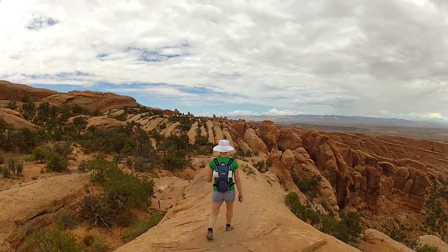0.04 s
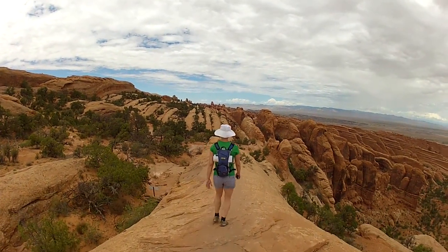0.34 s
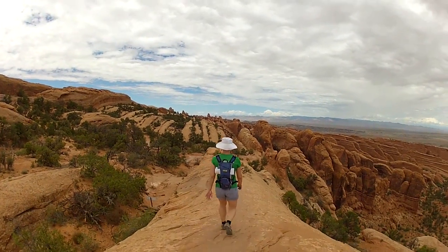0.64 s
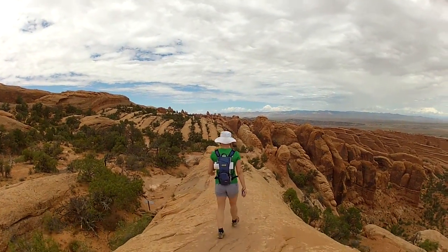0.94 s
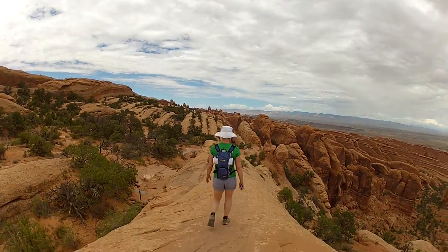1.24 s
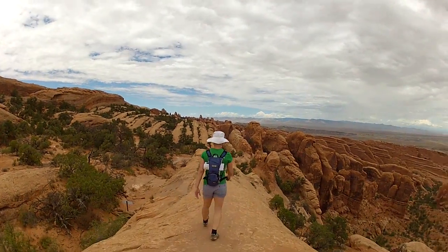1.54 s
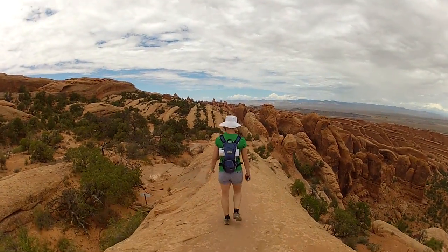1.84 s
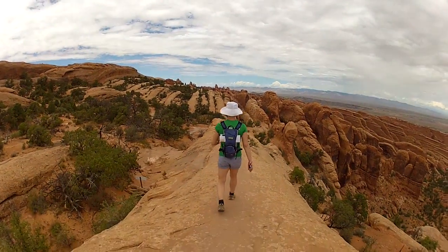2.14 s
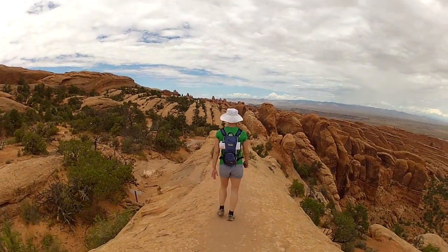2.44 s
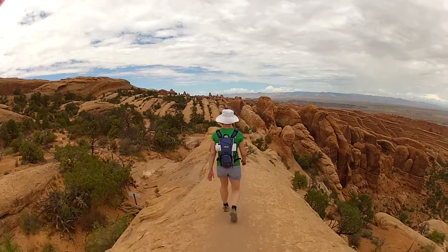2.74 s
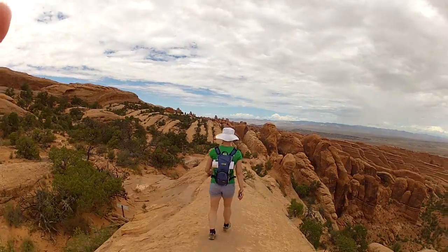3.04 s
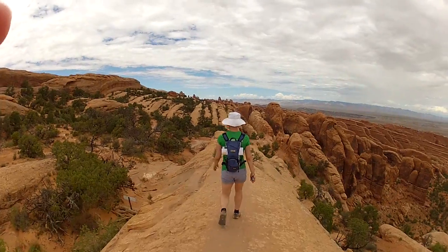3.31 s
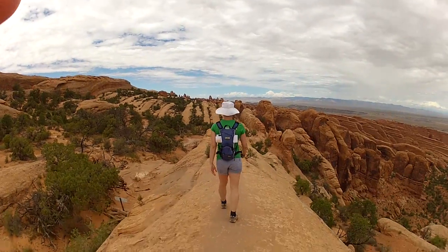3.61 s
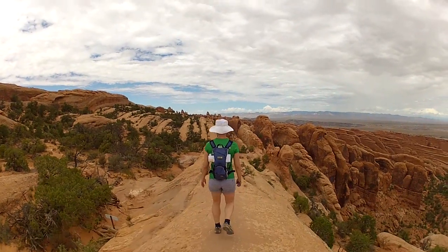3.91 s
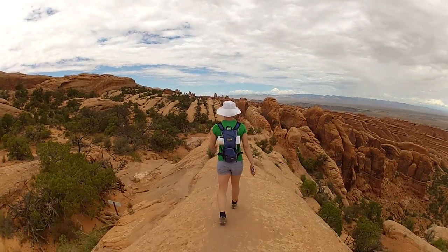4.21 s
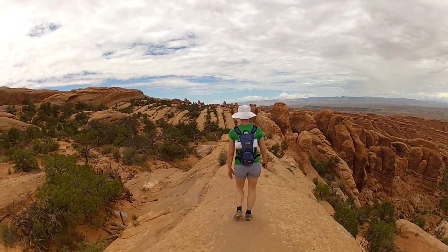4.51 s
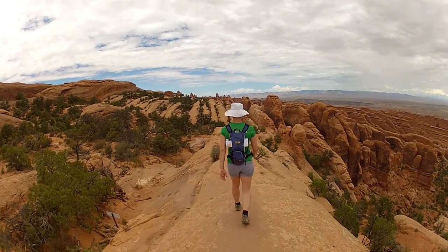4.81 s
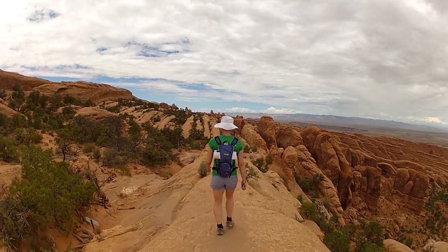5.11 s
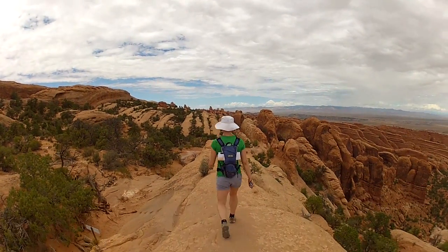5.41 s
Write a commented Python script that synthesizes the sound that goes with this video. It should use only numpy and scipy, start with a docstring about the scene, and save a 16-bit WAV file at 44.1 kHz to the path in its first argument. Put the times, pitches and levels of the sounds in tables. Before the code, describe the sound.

Low, booming wind buffets a hand-held microphone in the open air, strongest near the start and then dying down. Through it come steady footsteps on sandy stone, some dull and soft, others sharp clacks with a spit of grit. A buckle clicks on plastic about once a step, and clothes rustle faintly. The sound is close and dry, with a slightly glassy top.

```python
"""A walk along a bare sandstone ridge, heard close and without echo on a small cased camera in the hand.
From the start shoes tap and grind on the gritty rock, and a loose buckle ticks on the plastic case.
Within the first second gusts buffet the microphone. After two seconds they ease and the rock gets
sandier, with more grains cracking underfoot; by the end the wind has almost dropped.
Throughout, the camera's coarse sampling gives every sound a glassy top."""
import sys
import numpy as np
from scipy import signal
from scipy.fft import rfft, irfft, next_fast_len
from scipy.io import wavfile
from scipy.ndimage import uniform_filter1d

SR = 44100
rng = np.random.default_rng(int(sys.argv[2]) if len(sys.argv) > 2 else 0)


def persist_wave(psi):
    """Save psi, clipped to +-1, as 16-bit WAV."""
    counts = np.round(np.clip(psi, -1, 1) * 32767).astype(np.int16)
    wavfile.write(sys.argv[1], SR, np.atleast_2d(counts).T)


N = 249606
T = np.arange(N) / SR

# footfalls, about two a second: (time [s], heel thud [dB], heel clack [dB], grit [dB], clack pitch [Hz],
# heel-to-sole lag [s], sole clack [dB], grinding [dB], scuff [dB])
FOOTFALLS = [(0.093, -30.5, -35, -61, 1050, 0.0073, -45, -56, -61),
             (0.623, -20, -24, -31, 1100, 0.0041, -27, -60.5, -58.5),
             (1.117, -36, -23, -57, 1230, 0.0066, -22.5, -57.5, -56),
             (1.569, -36, -13.5, -23, 1290, 0.0048, -24.5, -60, -56.5),
             (2.002, -30, -30, -54, 1330, .005, -43, -61, -60),
             (2.497, -23, -22.5, -30, 1750, .004, -44, -65, -60.5),
             (3.029, -30.5, -27, -60, 1240, .005, -42, -52, -58),
             (3.57, -24.5, -13, -25, 1510, .003, -41, -55.5, -57),
             (4.047, -32, -37.5, -56, 1100, .009, -43.5, -52.5, -58.5),
             (4.521, -44, -57, -44, 1000, 0.0063, -54, -61, -60),
             (5.047, -25.5, -16.5, -34, 1720, 0.0024, -45, -55.5, -59),
             (5.543, -25, -15, -58, 1500, 0.0018, -45, -57, -59.5)]
# single eddies that hit the microphone port: (time [s], level [dB], frequency [Hz])
EDDIES = [(0.515, -18, 99), (0.572, -13.5, 170), (0.7565, 2, 120), (0.7964, -5.5, 135), (0.915, -17.5, 150),
          (1.051, -18, 121), (1.1, -12.5, 127), (1.254, -11.5, 157), (1.32, -13, 148), (1.38, -10.5, 140),
          (1.6172, -6, 180), (1.656, -10.5, 152), (1.963, -13.5, 148), (2.087, -17, 107), (2.255, -18, 158),
          (3.09, -21, 140), (3.256, -22, 143), (4.382, -23.5, 59.5), (4.635, -23, 75)]
# steady rustle of the walker's clothes: (time [s], level [dB])
CLOTHES = [(0, -63), (0.5, -64), (1.45, -62.5), (1.8, -60), (3.3, -60), (4.5, -59.3), (4.85, -61.5),
           (5.66, -62)]


def steps(graze_db=-23, graze_lead_s=0.006, sole_hz=925):
    """The tread brushes the sand, the heel lands and the sole follows; lighter taps fall in between."""
    # light, dull taps of the shoes: (time [s], clack [dB], thud [dB], clack pitch [Hz])
    taps = [(0.656, -42, -37, 1250), (1.069, -39, -47, 1510), (1.091, -42, -30.5, 1290),
            (1.14, -35, -36, 980), (1.201, -38, -43, 1300), (1.744, -41.5, -34, 905),
            (1.984, -42, -46, 915), (2.193, -43, -43, 960), (2.732, -47.5, -40.5, 1120),
            (2.806, -38, -37.5, 1820), (2.993, -37, -32.5, 1140), (3.257, -41.5, -34, 940),
            (3.326, -44, -36, 900), (4.318, -41, -35.5, 915), (4.378, -33, -41.5, 1760),
            (4.853, -52, -40, 900), (4.918, -36.5, -33.5, 1580), (4.991, -37, -35, 1100),
            (5.394, -60, -39.5, 900), (5.465, -37.5, -34.5, 1450)]
    out = np.zeros(N)
    for s, thud_db, clack_db, grit_db, pitch_hz, lag_s, sole_db, *_ in FOOTFALLS:
        graze = band(rng.standard_normal(SR // 80), 500, 4500) * np.hanning(SR // 80)
        add(out, s - graze_lead_s, from_db(clack_db + graze_db) * peak_one(graze))
        add(out, s, shoe(thud_db, clack_db, grit_db, pitch_hz))
        add(out, s + lag_s, shoe(sole_db + 1, sole_db, sole_db + 0.5, sole_hz))   # lower than the heel
    for s, clack_db, thud_db, pitch_hz in taps:
        add(out, s, shoe(thud_db, clack_db, clack_db - 14, pitch_hz, crush_s=0.0024, crush_db=-13))
    return out


def shoe(thud_db, clack_db, grit_db, pitch_hz, crush_s=0.0018, crush_db=-18):
    """Each contact gives a thud of the heel, a dry clack of the sole and a spit of grit."""
    # resonances of a sole on rock: (multiple of the clack pitch, width [Hz], relative level [dB])
    sole_modes = [(.72, 450, -42.5), (1.05, 570, 28), (1.55, 600, 13)]
    t = np.arange(SR // 16) / SR
    force = contact(t, crush_s, crush_db)
    thud = band(band(force, 200, 740), 150, 880, order=1)
    sole = sum(from_db(db) * resonate(force, ratio * pitch_hz, width) for ratio, width, db in sole_modes)
    clack = band(sole, 660, 2420, order=4)   # rubber swallows the treble
    grit = band(contact(t, crush_s=0.0014, crush_db=-17.5), 2670, 4840)
    return (from_db(thud_db) * peak_one(thud)
            + from_db(clack_db) * peak_one(clack)
            + from_db(grit_db) * peak_one(grit))


def contact(t, crush_s, crush_db, touch_s=0.0012):
    """Grains begin to crush, the hard touch follows, and the crushing dies away."""
    weight = np.minimum(t / touch_s, 1) * np.exp(-np.maximum(t - touch_s, 0) / crush_s)
    force = from_db(crush_db) * rng.standard_normal(len(t)) * weight
    force[int(touch_s * SR)] += 1
    return force


def buckle(bounce_s=0.004, bounce_db=-6, usual_brightness_db=-11, grip_detune=0.0035):
    """Right by the microphone the buckle hits the case and bounces once; the grip shifts the modes."""
    # knocks of the buckle: (time [s], level [dB], brightness [dB])
    knocks = [(0.126, -31, -13), (0.678, -36, -13), (0.7097, -38.5, -12.5), (1.179, -44.5, -21),
              (1.6362, -35, -10.5), (1.8047, -17, -11), (2.1139, -27.5, -11.5), (2.6413, -28, -12),
              (3.1309, -21, -10), (3.6497, -33, -11), (4.0935, -24.5, -9.5), (4.6149, -20.5, -12),
              (4.73, -32, -13.5), (5.1268, -29, -10)]
    # modes of the plastic case: (frequency [Hz], relative level [dB], time to fall 60 dB [s])
    case_modes = [(1132, -19.5, 0.059), (1580, -22, 0.035), (2082, -4, 0.039), (2390, -6.5, 0.035),
                  (2747, 3, 0.012), (2811, 3.5, 0.024), (3060, -4.5, 0.039), (3178, -5, 0.037),
                  (3630, 3.5, 0.0048), (3820, -6, 0.019), (3910, -4, 0.027), (4255, -13, 0.019),
                  (4384, -15.5, 0.04), (5150, -14, 0.022), (5233, 6.5, 0.0062)]
    out, t = np.zeros(N), np.arange(SR // 12) / SR
    rest_hz, mode_db, t60 = np.transpose(case_modes)[:, :, None]
    for s, db, bright_db in knocks:
        hz = rest_hz * (1 + grip_detune * rng.standard_normal(rest_hz.shape))
        octaves_up = np.log2(np.maximum(hz / 2800, 1))
        tilt_db = 4.0 * (bright_db - usual_brightness_db) * octaves_up   # hard touches wake upper modes
        shell = 0
        for delay_s, touch_db in [(0, 0), (bounce_s * rng.uniform(0.611, 1.0), bounce_db)]:
            age = np.maximum(t - delay_s, 0)
            strength = from_db(mode_db + tilt_db + touch_db + rng.normal(0, 1.7, hz.shape))
            phase = 2 * np.pi * (hz * age + rng.random(hz.shape))
            rings = strength * np.sin(phase) * np.exp(-np.log(1000) * age / t60)
            onset = 1 - np.exp(-age / 0.00071)   # the shell takes a moment to speak
            shell = shell + rings.sum(axis=0) * onset
        skid = band(rng.standard_normal(len(t)), 1240, 5300) * t * np.exp(-t / 0.0016)
        add(out, s, from_db(db + 3.0) * (peak_one(shell) + from_db(-10.5) * peak_one(skid)))
    return out


def buffets():
    """An eddy sucks at the diaphragm: a trough between lesser crests, steep-fronted if it is strong."""
    out, t = np.zeros(N), np.arange(-SR // 50, SR // 50) / SR
    front = np.tanh((t + 0.0008) / 0.00006) - 1
    for s, db, hz in EDDIES:
        steepness = 0.04 * min(from_db(db), 1) ** 8
        phase_squared = (np.pi * hz * t + steepness * front) ** 2
        add(out, s + t[0], from_db(db) * (2 * phase_squared - 1) * np.exp(-phase_squared))
    return out


def wind(ceiling_db=-13.5, usual_db=-25.5, calm_flutter_db=-57.5, puff_db=-22, puff_s=0.018):
    """Faster air sheds smaller eddies: sway and rumble in the breeze, boom, flutter and roar in gusts."""
    # strength of the air over the microphone: (time [s], level [dB])
    airflow = [(0.02, -26.5), (0.1, -48.5), (0.33, -60), (0.52, -30.5), (0.58, -23.5), (0.6, -49),
               (0.63, -26.5), (0.68, -42), (0.74, -10.5), (0.79, -12.5), (0.84, -25), (0.91, -20),
               (0.99, -39), (1.1, -20.5), (1.15, -38.5), (1.25, -18), (1.34, -32.5), (1.38, -20.5),
               (1.42, -36), (1.48, -25), (1.51, -28.5), (1.62, -14.5), (1.78, -37.5), (1.82, -26.5),
               (1.92, -37.5), (1.95, -22.5), (2.22, -33), (2.25, -25.5), (2.52, -27), (2.72, -37.5),
               (3.08, -26), (3.35, -36.5), (3.41, -29), (3.48, -41.5), (3.57, -35), (3.66, -50.5),
               (3.74, -37.5), (3.84, -50), (3.92, -33), (3.95, -44), (3.99, -30), (4.32, -42.5),
               (4.37, -33.5), (4.57, -39), (4.64, -33), (4.84, -46.5), (5.01, -36.5), (5.38, -53),
               (5.57, -47), (5.66, -62)]
    # spectra of the wind's five layers, lowest first: (frequency [Hz], relative level [dB])
    sway_spectrum = [(15, -14), (25, -7.5), (38, 2.5), (55, -20.5), (80, -21)]
    rumble_spectrum = [(30, -30), (50, -3.5), (70, 2), (100, -0.5), (130, -12), (200, -18.5)]
    boom_spectrum = [(70, -3), (105, -7), (125, 4), (155, -5), (195, -6), (250, -13.5), (400, -39)]
    flutter_spectrum = [(120, -20), (200, 4.5), (270, 1.5), (360, -3.5), (470, -16.5), (600, -28),
                        (800, -36.5)]
    roar_spectrum = [(300, -8.5), (450, 10), (600, -2), (800, -9), (1100, -24), (1600, -39.5)]
    wind_db = np.minimum(in_time(airflow), ceiling_db)   # anything stronger arrives as single eddies
    gust_db = -39.5 + 1.48 * (wind_db - usual_db)   # flutter grows faster than the wind
    # each eddy breaks up in a short puff of flutter
    puffs = swells([(s, db + puff_db) for s, db, _ in EDDIES], lambda t: np.exp(-(t / puff_s) ** 2))
    flutter_db = 10 * np.log10(from_db(gust_db) ** 2 + puffs ** 2 + from_db(calm_flutter_db) ** 2)
    breeze_db = uniform_filter1d(wind_db, SR // 16)
    boom_share = np.interp(wind_db, [-36, -24], [0.1, 0.75])
    sway = from_db(0.82 * breeze_db - 15) * coloured(rng.standard_normal(N), sway_spectrum)
    rumble_gain = np.sqrt(1 - boom_share) * from_db(wind_db - 0.03)
    rumble = rumble_gain * turbulence(rumble_spectrum, even_s=0.049, lumpy_db=6)
    boom = np.sqrt(boom_share) * from_db(wind_db - 1) * turbulence(boom_spectrum, even_s=0.052)
    flutter = from_db(flutter_db) * turbulence(flutter_spectrum, even_s=0.052)
    roar = from_db(1.433 * flutter_db - 4) * turbulence(roar_spectrum, even_s=0.083)
    return sway + rumble + boom + flutter + roar


def turbulence(spectrum, even_s, lumpy_db=7):
    """Low noise broken into quick lumps, with its slow level evened out."""
    lumps = coloured(rng.standard_normal(N), spectrum) * from_db(lumpy_db * drift(35))
    slow_power = uniform_filter1d(lumps * lumps, int(even_s * SR))
    return lumps / np.sqrt(slow_power + 1e-4)


def cracks(sandy_from_s=2.1, small_per_s=8):
    """A grain gives way in one thin, bright snap; on the sandier rock small ones do so at random."""
    # single sand grains that crack underfoot: (time [s], level [dB])
    grains = [(0.3466, -50.5), (1.8895, -48), (2.2268, -49), (3.0343, -45), (3.0819, -43), (3.1777, -39),
              (3.5426, -45), (3.7618, -50), (5.0913, -42), (5.1484, -41)]
    out, t = np.zeros(N), np.arange(SR // 50) / SR
    slots = np.arange(sandy_from_s, N / SR, 1 / small_per_s)
    small_grains = [(s + rng.random() / small_per_s, rng.normal(-47.5, 0.5)) for s in slots]
    for s, db in list(grains) + small_grains:
        snap = band(contact(t, crush_s=0.0012, crush_db=-20), 3700, 6500)
        add(out, s, from_db(db + 6.5) * peak_one(snap))
    return out


def grinding(rough_db=5, fade_s=0.05):
    """Rubber grinds roughly on the rock around the moment of each footfall."""
    pressure = swells([(s, db) for s, *_, db, scuff_db in FOOTFALLS],
                      lambda t: np.exp(-np.abs(t) / fade_s))
    friction = rng.standard_normal(N) * from_db(rough_db * drift(120))
    return pressure * rms_one(resonate(friction, hz=950, width_hz=690))


def slides():
    """A sole hisses over sand: friction noise in one resonance, swelling and fading with the stroke."""
    # slides of a sole: (middle [s], half length [s], level [dB], frequency [Hz], width [Hz])
    strokes = [(1.336, .027, -58, 4900, 900), (2.055, 0.042, -59, 4950, 600), (2.214, .085, -59, 5100, 600),
               (4.459, 0.021, -45.5, 3570, 2420)]
    out = np.zeros(N)
    for s, half_s, db, hz, width_hz in strokes:
        stroke = np.hanning(int(2 * half_s * SR))
        rub = rms_one(resonate(rng.standard_normal(SR // 2), hz, width_hz))[:len(stroke)]
        add(out, s - half_s, from_db(db) * stroke * rub)
    return out


def scuff(lead_s=0.088, hold_s=0.037, decay_s=0.14):
    """A soft rustle swells as each foot takes the weight, and fine sand crackles more often with it."""
    tread = swells([(s, db) for s, *_, db in FOOTFALLS],
                   lambda t: np.clip(t / lead_s + 1, 0, 1) * np.exp(-np.maximum(t - hold_s, 0) / decay_s))
    level_db = 20 * np.log10(np.hypot(from_db(in_time(CLOTHES)), tread))
    # spectrum of rubbing sand and cloth: (frequency [Hz], relative level [dB])
    rustle_spectrum = [(300, 10), (600, 6.5), (1000, 2), (2000, -0.5), (3000, -0.5), (4000, -4), (5000, -2),
                       (6000, 1)]
    rustle = coloured(rng.standard_normal(N) * from_db(2.6 * drift(30)), rustle_spectrum)
    grains_per_s = 110 * from_db(1.5 * (level_db - np.mean(level_db)))
    sizes = from_db(2.7 * np.minimum(rng.exponential(1, N), 3)) * rng.choice([-1, 1], N)
    grains = sizes * (rng.random(N) < grains_per_s / SR)
    crackle = rms_one(band(grains + 1e-18, 4520, 4830))
    return from_db(level_db) * (rustle + from_db(-14.5) * crackle)


def swishes(after_s=0.26, swing_s=0.15):
    """Cloth brushes as the legs pass after each footfall, fainter when the clothes rustle less."""
    strokes = swells([(s + after_s, -66.5) for s, *_ in FOOTFALLS], lambda t: np.exp(-(t / swing_s) ** 2))
    cloth_db = in_time(CLOTHES)
    rub = rms_one(resonate(rng.standard_normal(N), hz=3600, width_hz=3100))
    return from_db(2 * (cloth_db - cloth_db.max())) * strokes * rub


def swells(events, shape):
    """One smooth shape, a function of the time since the event, laid at every (time [s], level [dB])."""
    t = T[::64]
    return np.interp(T, t, sum(from_db(db) * shape(t - s) for s, db in events) + 1e-9)


def drift(rate_hz):
    """A random wander of rms 1, mostly slower than rate_hz."""
    spectrum = rng.standard_normal(1000) + 1j * rng.standard_normal(1000)
    hz = np.arange(len(spectrum)) * SR / N
    slow = irfft(spectrum / (1 + (hz / rate_hz) ** 2), 8192)
    return np.interp(T, np.linspace(0, N / SR, len(slow)), rms_one(slow))


def coloured(x, spectrum):
    """Give a steady sound a spectrum that falls away at both ends; rms 1."""
    hz, db = np.transpose(spectrum)
    size = next_fast_len(N)
    log_hz = np.log(np.arange(size // 2 + 1) * SR / size + 1)
    log_corners = np.log(np.r_[hz[0] / 2, hz, hz[-1] * 2])
    gain = from_db(np.interp(log_hz, log_corners, np.r_[db[0] - 40, db, db[-1] - 60]))
    return rms_one(irfft(rfft(x, size) * gain, size)[:N])


def resonate(x, hz, width_hz):
    """A resonance with gain 1 at its peak."""
    r = np.exp(-np.pi * width_hz / SR)
    feedback = [1, -2 * r * np.cos(2 * np.pi * hz / SR), r * r]
    return signal.lfilter(np.array([1, 0, -1]) * (1 - r * r) / 2, feedback, x)


def band(x, low_hz, high_hz, order=2):
    """Causal band-pass."""
    return signal.sosfilt(signal.butter(order, [low_hz, high_hz], "band", fs=SR, output="sos"), x)


def add(out, s, sound):
    """Mix a sound in at time s."""
    at = int(np.clip(round(s * SR), 0, N - 1))
    out[at:at + len(sound)] += sound[:N - at]


def in_time(curve):
    """A (time [s], level [dB]) curve at every sample."""
    return np.interp(T, *np.transpose(curve))


def from_db(db):
    """Decibels to gain."""
    return np.exp(np.asarray(db) * (np.log(10) / 20))


def rms_one(x):
    """Scale to rms 1."""
    return x / np.sqrt(np.mean(x ** 2) + 1e-20)


def peak_one(x):
    """Scale to peak 1."""
    return x / (np.max(np.abs(x)) + 1e-20)


def scene():
    """Everything reaches one hand-held microphone from close by; the open ridge gives no echo."""
    air = wind() + buffets()
    walker = steps() + grinding() + slides() + swishes() + buckle() + scuff() + cracks()
    return (air + walker)[None]


def record(dry):
    """The camera holds 12 kHz samples, mirroring the sound faintly around 12 kHz; it clips, then cuts."""
    narrow = signal.sosfiltfilt(signal.butter(12, 5650, fs=SR, output="sos"), dry)
    coarse = signal.resample_poly(narrow, 48000, SR, axis=-1)[:, ::4]
    held = signal.resample_poly(np.repeat(coarse, 4, axis=-1), SR, 48000, axis=-1)[:, :N]
    top_cut = signal.ellip(8, 0.3, 70, 15500, fs=SR, output="sos")
    return signal.sosfilt(top_cut, np.clip(held, -1, 1))


dry = scene()
out = record(dry)
persist_wave(out)
```